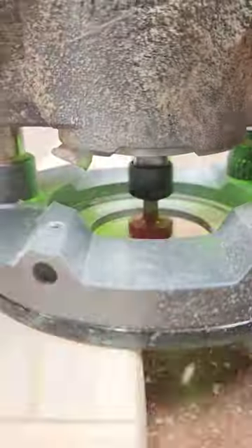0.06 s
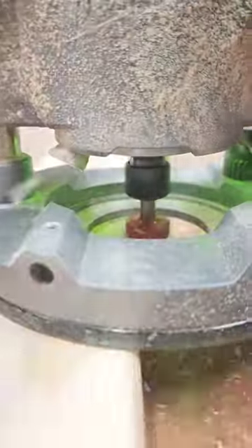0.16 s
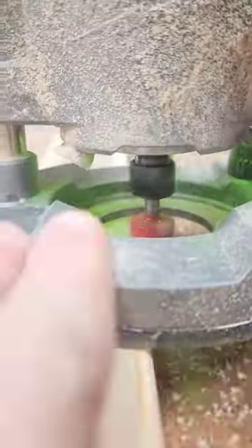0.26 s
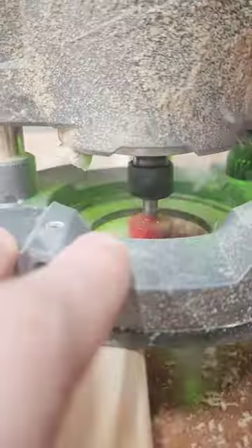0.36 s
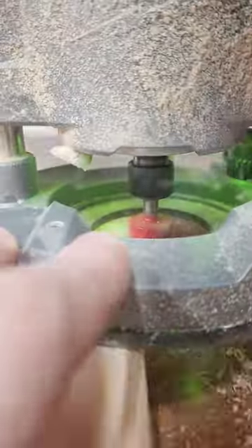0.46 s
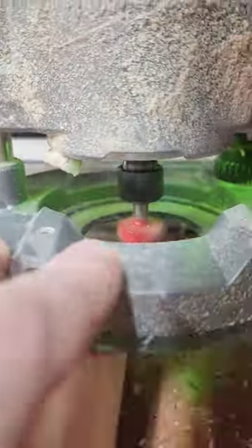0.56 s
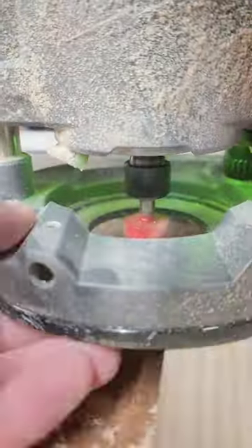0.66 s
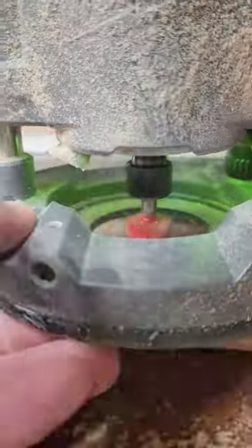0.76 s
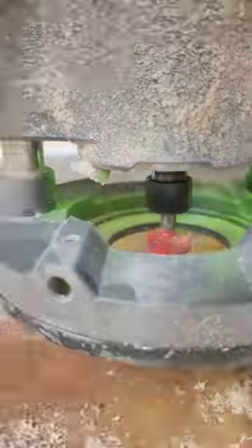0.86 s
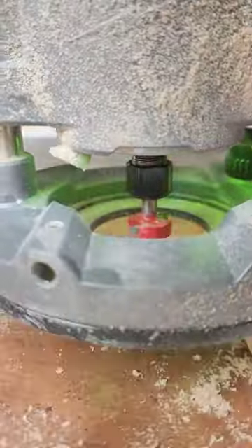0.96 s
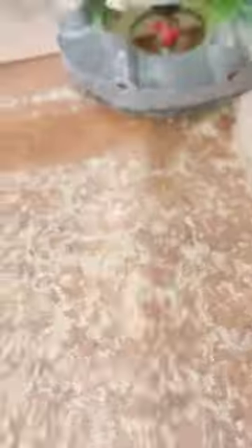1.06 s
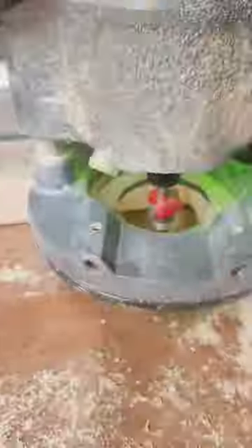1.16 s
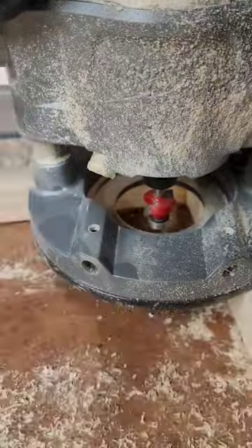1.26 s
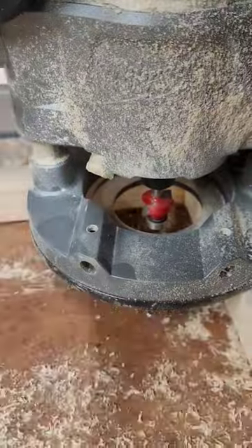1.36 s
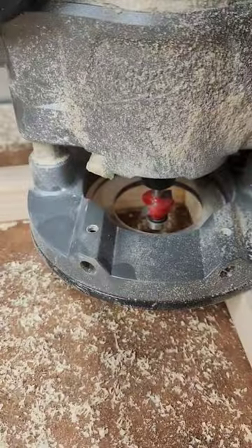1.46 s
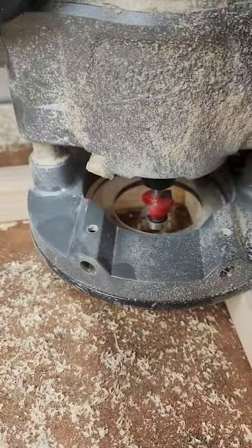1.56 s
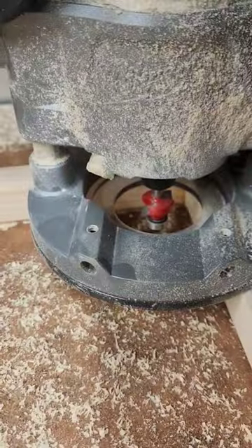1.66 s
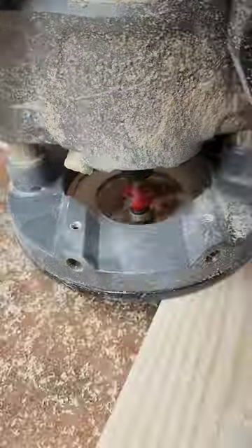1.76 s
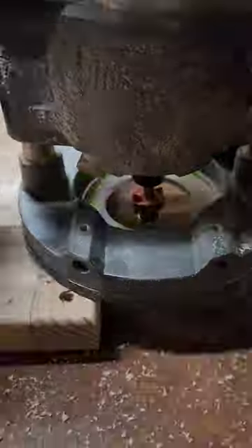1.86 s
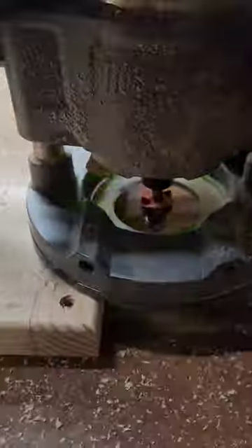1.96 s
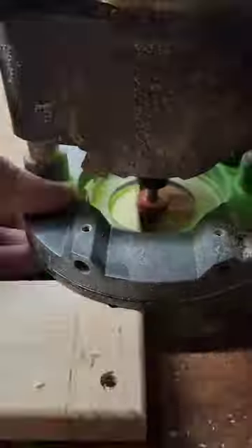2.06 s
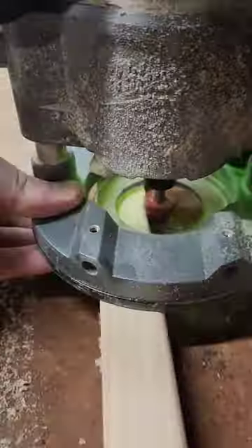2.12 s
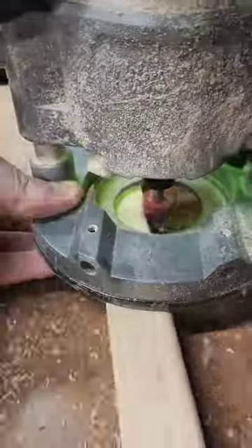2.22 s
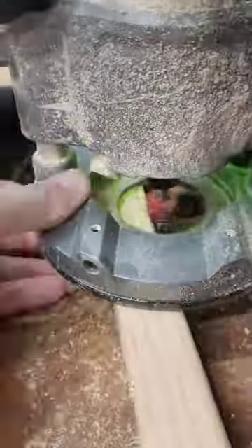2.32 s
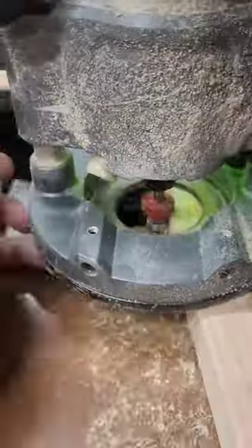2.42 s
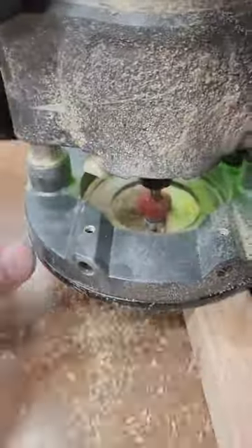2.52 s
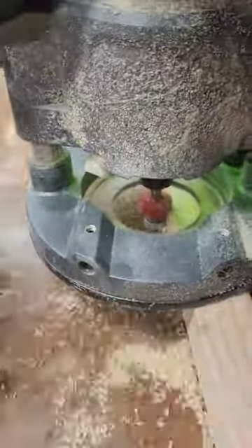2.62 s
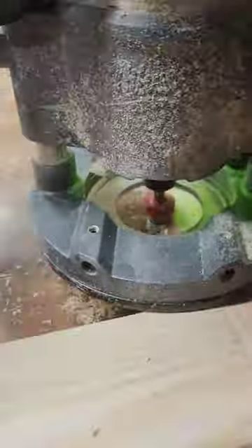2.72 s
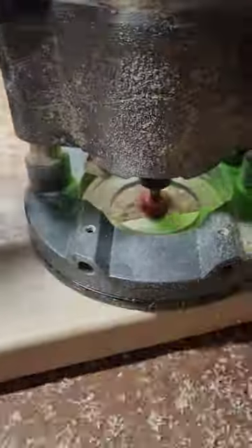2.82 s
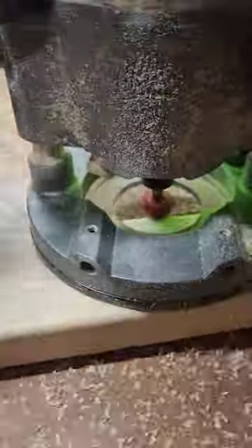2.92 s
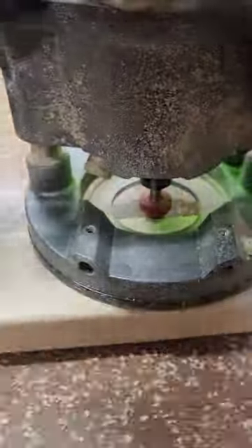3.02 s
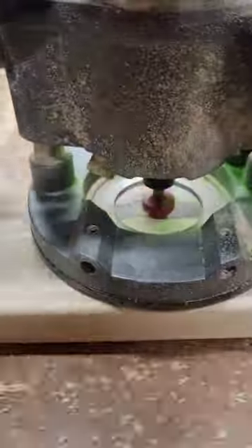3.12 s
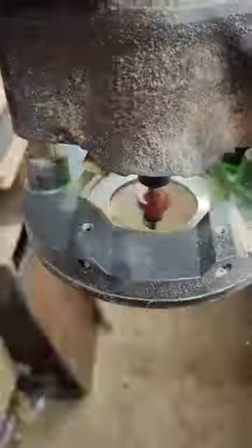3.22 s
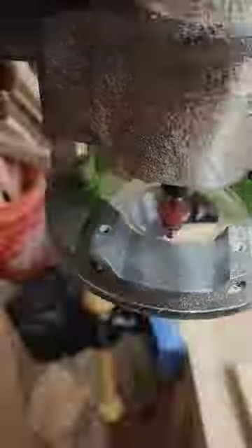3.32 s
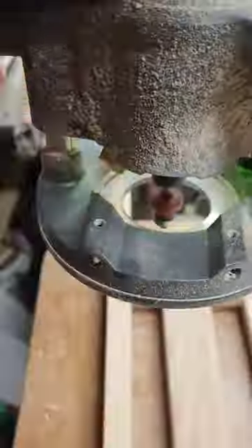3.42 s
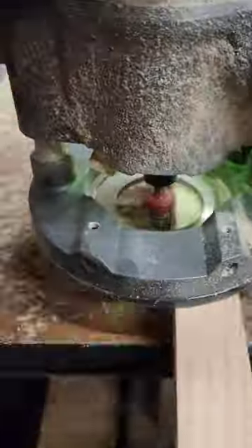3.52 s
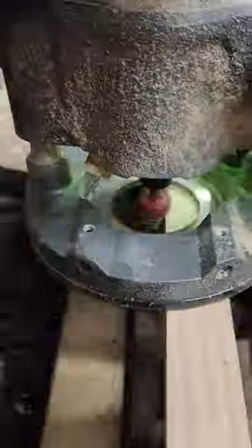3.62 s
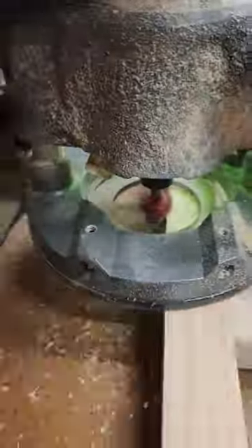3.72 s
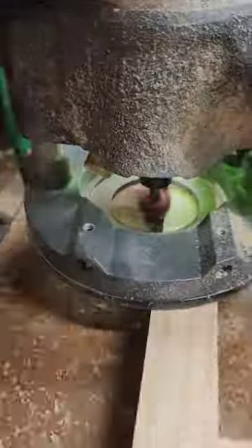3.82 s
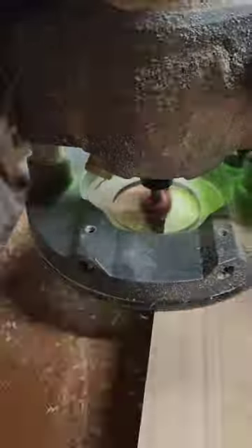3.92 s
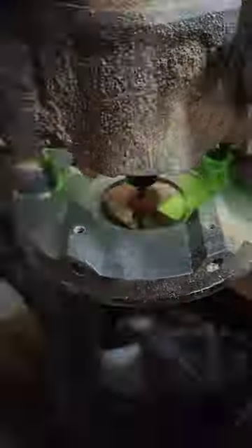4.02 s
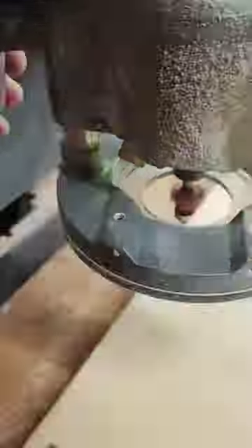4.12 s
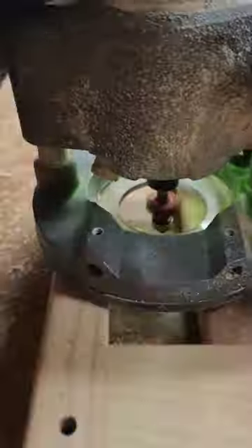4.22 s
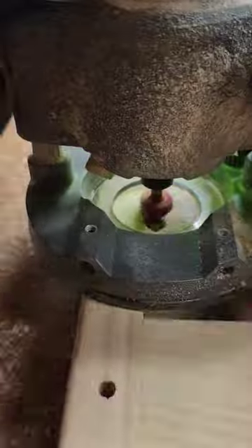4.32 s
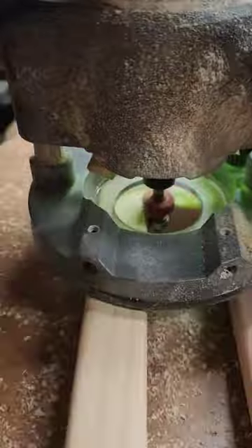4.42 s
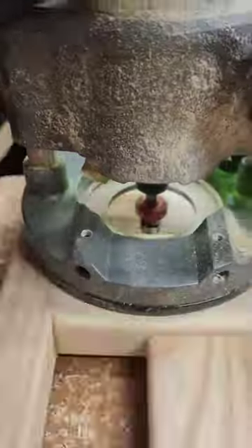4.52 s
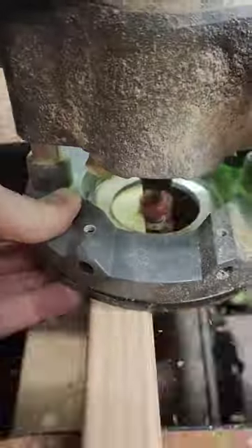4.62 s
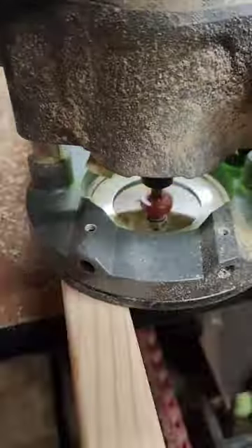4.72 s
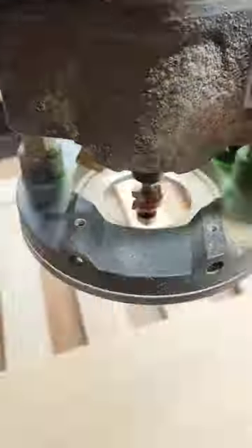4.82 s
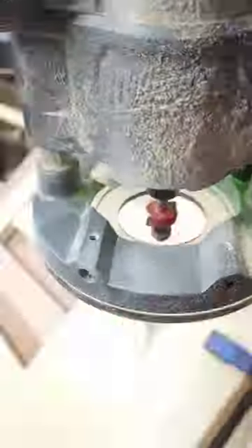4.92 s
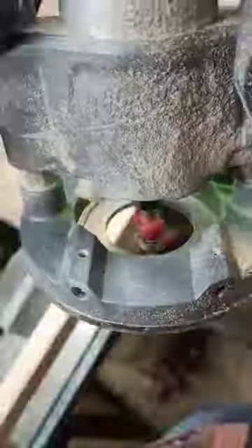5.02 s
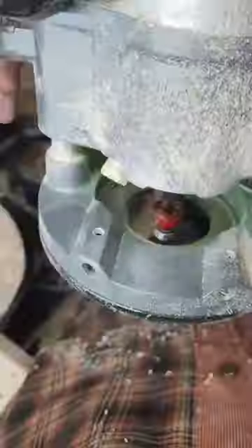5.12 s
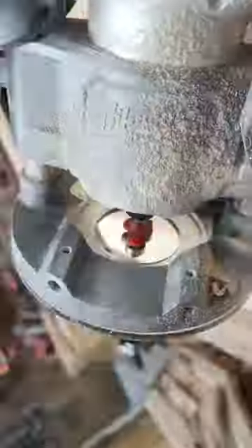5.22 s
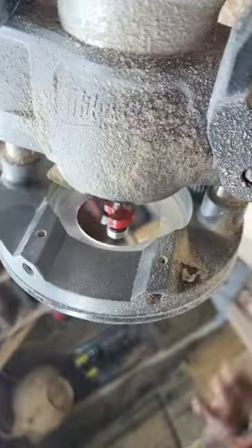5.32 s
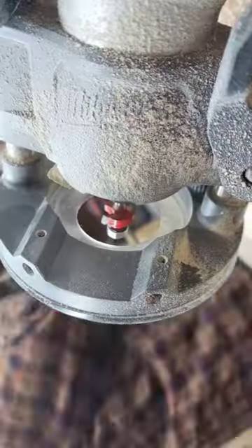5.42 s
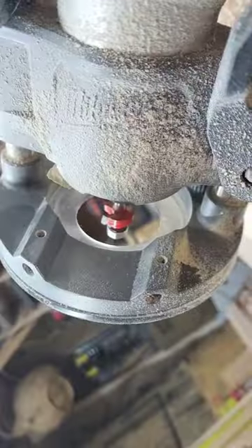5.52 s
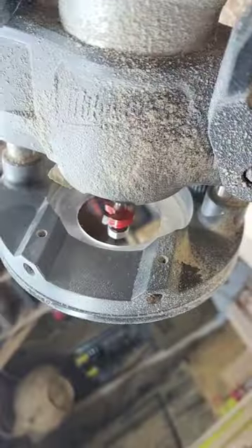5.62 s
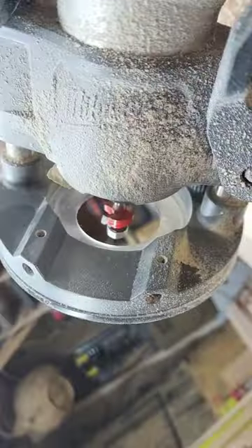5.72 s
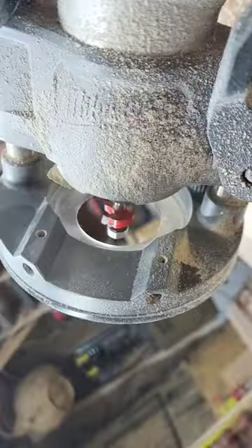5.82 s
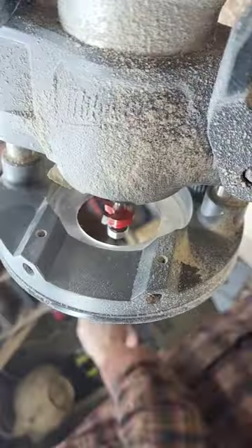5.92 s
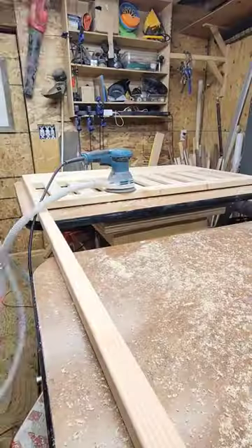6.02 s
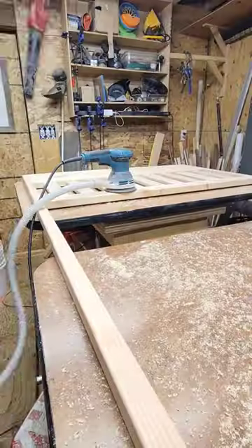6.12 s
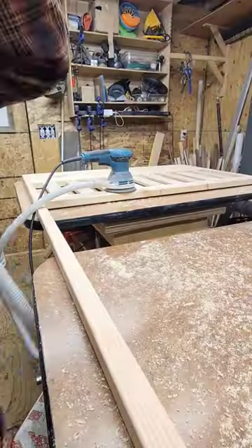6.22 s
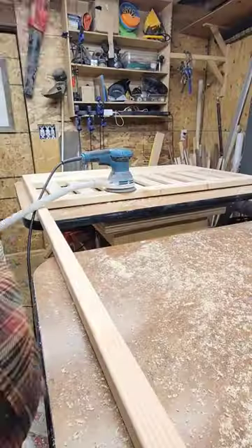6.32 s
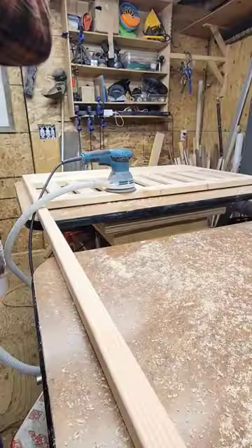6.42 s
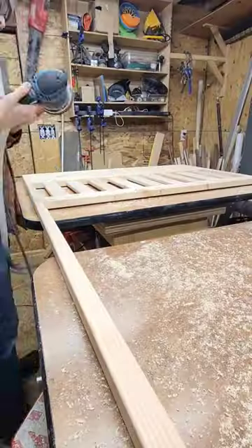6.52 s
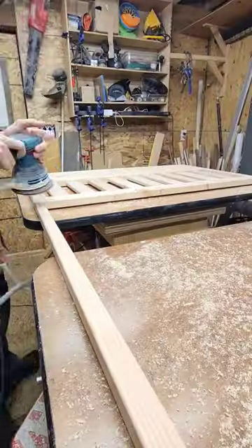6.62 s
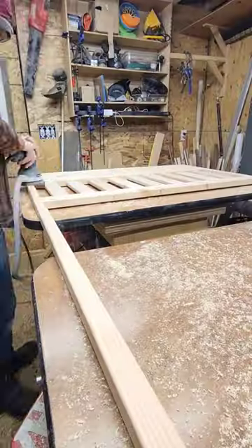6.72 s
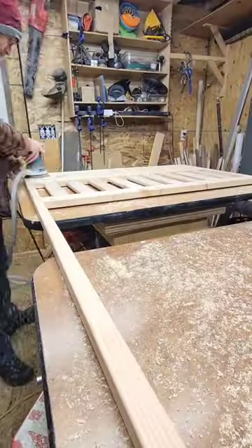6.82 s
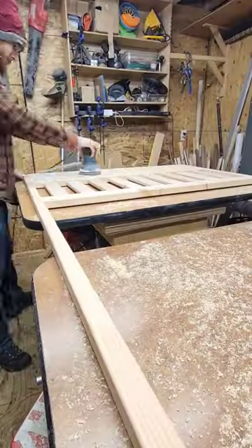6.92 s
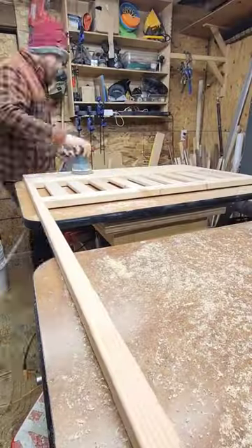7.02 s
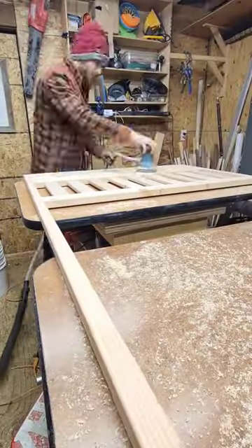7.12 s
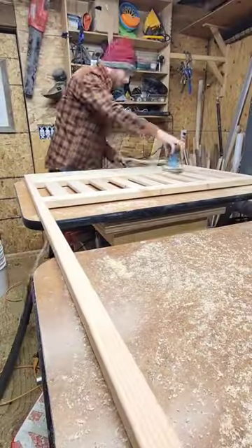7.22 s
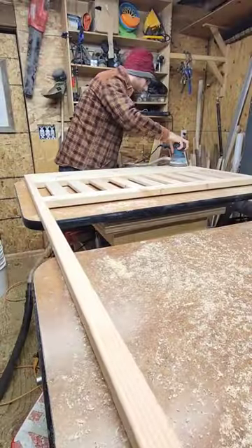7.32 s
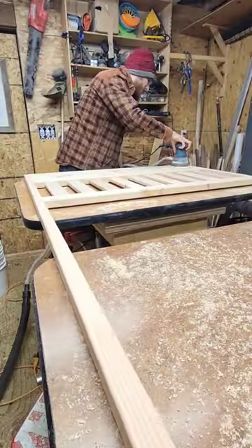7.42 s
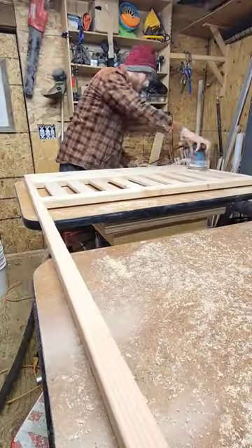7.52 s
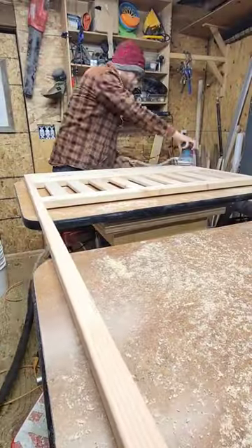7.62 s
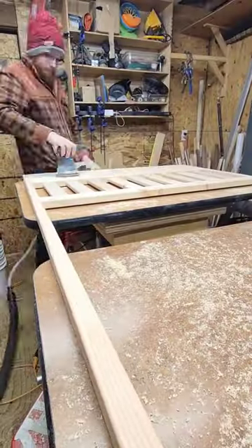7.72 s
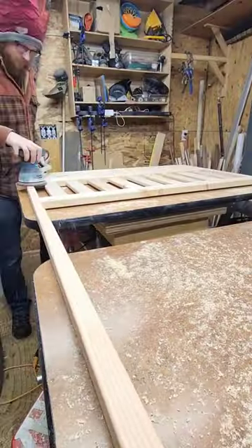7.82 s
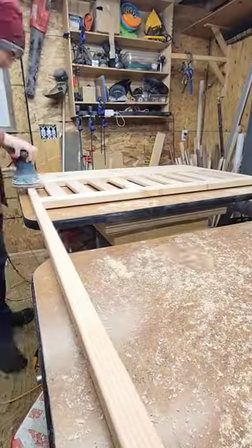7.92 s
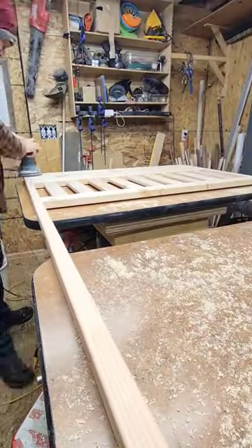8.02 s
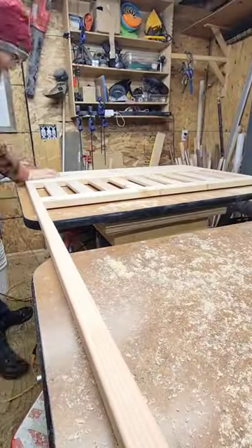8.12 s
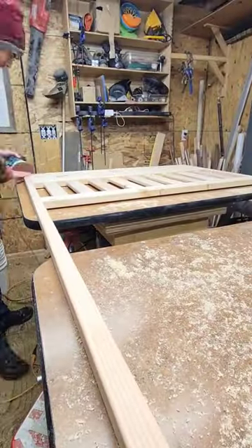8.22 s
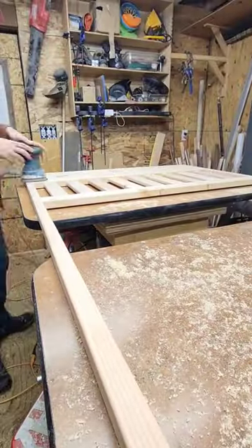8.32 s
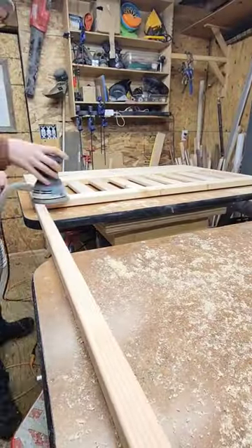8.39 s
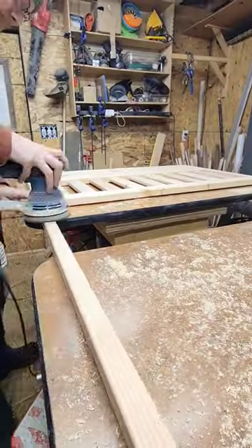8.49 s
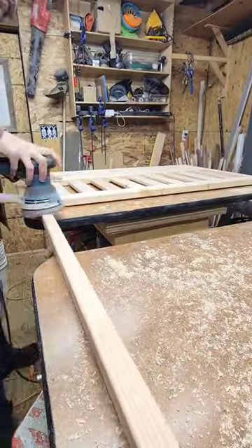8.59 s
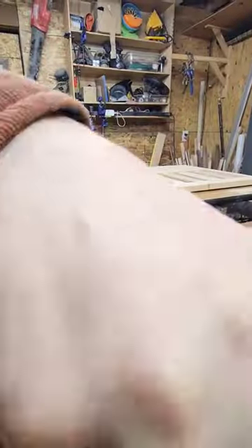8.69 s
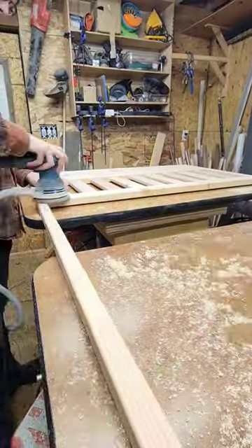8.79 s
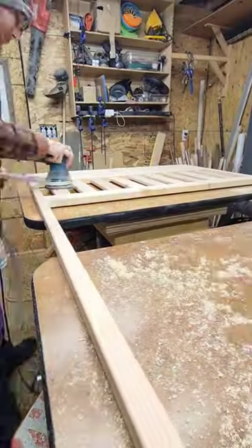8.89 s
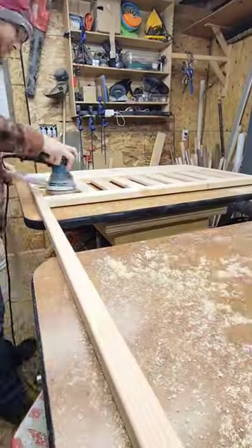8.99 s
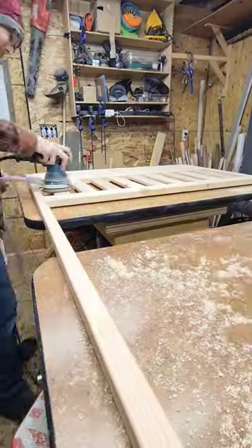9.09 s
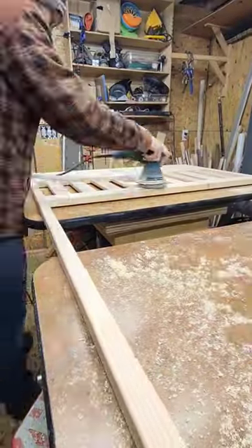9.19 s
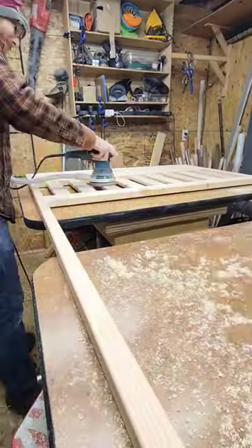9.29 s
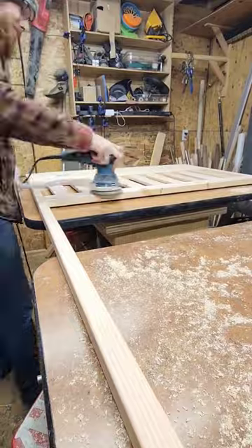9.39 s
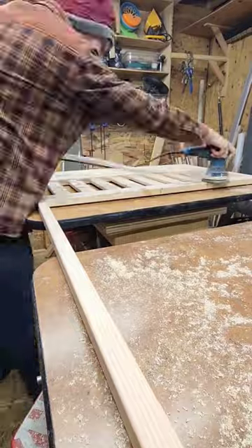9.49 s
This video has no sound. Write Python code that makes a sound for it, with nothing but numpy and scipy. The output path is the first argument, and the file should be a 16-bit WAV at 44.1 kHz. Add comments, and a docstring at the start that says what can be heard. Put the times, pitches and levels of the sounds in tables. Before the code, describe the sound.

A small woodworking shop, caught close up by a phone and sped up, so sounds are chopped about 43 times a second and burble with a fine ticking rattle. From 0 to 1 s a router whines near 5 kHz over bright rushing air, dipping in pitch as it bites wood, then brakes abruptly. Until 2.1 s there is quiet hiss, thin high electronic singing and a few light knocks. The router runs again from 2.1 to 4.9 s, swelling and sagging through repeated bites, with knocks just after 4 s. From 5 to 6.4 s it clatters down: hollow taps, gritty slides, sharpest cracks around 5.5 s. At 6.4 s a sander spins up in a tenth of a second to dense bright hiss; at 6.7 s suction rushes in and the hose whistles waveringly near 2 kHz. Around 8.75 s the hiss briefly eases while the whistle stands out, then it continues to the end, about 9.5 s.

```python
"""A cordless trim router whines along wood in a small shop, close to a phone: harmonics over air and cutting noise.
It pauses with its electronics singing, runs again and is put down with a clatter of ringing knocks and gritty slides.
Then an orbital sander spins up, its noise shaped by housing resonances, and its dust hose begins to whistle.
It is a time-lapse: snippets butt against each other, 43 a second, and every cut breaks the phase of
the tones, so they burble; the level dips around each cut and loud tones leave ticks."""
import sys
import numpy as np
from scipy import signal
from scipy.fft import rfft, irfft
from scipy.io import wavfile

SR = 44100
rng = np.random.default_rng(int(sys.argv[2]) if len(sys.argv) > 2 else 0)


def digitize_waveform(pressure):
    """Quantize a signal to 16-bit integers and store it at the path in sys.argv[1].

    Rows of a 2-D input are taken as channels; values are limited to [-1, 1].
    """
    field = np.atleast_2d(pressure).T
    bounded = np.clip(field, -1, 1)
    quanta = np.round(bounded * 32767).astype(np.int16)
    wavfile.write(sys.argv[1], SR, quanta)


N = 421155
TIME = np.arange(N) / SR
FREQS = np.maximum(np.arange(N // 2 + 1) * SR / N, 1)
EARS = np.array([[1], [-1]])  # left, right

# Levels below are settings: scatter and trims may be added where the sounds are made.
# Snippet length, and the first cut of each tool's stretch
SNIPPET_S = 1024 / 44100
ROUTER_CUT_S, SANDER_CUT_S = .0153, .0152
# Ticks at the cuts, relative to the tone that is cut
ROUTER_TICK_DB, HOSE_TICK_DB = 11.5, 20.5

# Still air of the shop, colour: pitch_hz, level_db
SHOP_COLOUR = [(24, -56.5), (40, -19), (350, -13.5), (670, -9), (1640, -14), (3300, -10), (8960, -14),
               (14400, -12.5), (15500, -13)]
SHOP_DB = -64

# The router's two runs: start_s, stop_s; the brake acts at the end of the first
ROUTER_RUNS = [(.0155, 1.037), (2.105, 4.938)]
BRAKE_S, BRAKE_RATE_PER_S = 1.019, 34
# Colour of the router's cooling air: pitch_hz, level_db
ROUTER_AIR_COLOUR = [(1500, -22.5), (3000, -10), (4500, -3), (6000, -0.5), (8000, -0.5), (11000, 1),
                     (13000, 0), (15500, 2)]
# Colour of the bit's cutting noise: pitch_hz, level_db
CUTTING_COLOUR = [(30, -28), (150, -27), (350, -12), (700, -2.5), (1200, -1.5), (1900, 1), (3200, 3.5),
                  (5000, -1.5), (9000, -29)]
# One row for each run: cooling_air_db, cutting_noise_db
RUN_LEVELS_DB = [(-25, -35), (-27, -38.5)]
# The whine of the free-running router sinks slowly as the battery tires
FREE_HZ, DROOP_HZ_PER_S = 4983, 19
# The bit bites into the wood: start_s, stop_s, build_s (time to full sag), sag_hz
BIT_BITES = [(.09, .68, .17, 160), (.70, .78, 0.035, 75), (.81, .91, 0.019, 126.5), (2.16, 2.48, 0.18, 165),
             (2.54, 2.92, 0.23, 175.6), (2.88, 3.31, 0.3, 195), (3.65, 4.19, .08, 175.3),
             (4.39, 4.58, .05, 93.7), (4.66, 4.84, .06, 165)]
RELEASE_S, FULL_SAG_HZ = 0.055, 181  # the bit comes free; sag at full load
# What full load adds: cooling air, cutting noise, whine left minus right
LOAD_AIR_DB, LOAD_CUT_DB, LOAD_PAN_DB = -1.1, 0.74, -3
WHINE_PAN_DB = 7.5  # left minus right when running free
# Whine as the router turns before the phone: time_s, level_db
WHINE_CURVE = [(0.03, -22.0), (0.35, -19.5), (0.4, -23), (0.44, -17.5), (0.77, -24.5), (0.86, -24),
               (1.0, -24.0), (2.12, -26.5), (2.28, -18), (2.37, -30), (2.53, -17), (2.7, -32),
               (2.74, -17.5), (2.91, -28.5), (3.21, -19.5), (3.44, -30.5), (3.72, -18.5), (4.18, -24),
               (4.48, -19.5), (4.65, -25), (4.76, -17), (4.93, -31.5)]
# Overtones of the whine: time_s, second_harmonic_db, third_harmonic_db
OVERTONE_CURVE = [(0.03, -21, -33), (0.17, -21.5, -24.5), (0.21, -15.5, -28), (0.47, -15.5, -43),
                  (0.86, -24.5, -19), (1.0, -21.5, -33), (2.12, -24.5, -31), (2.51, -27, -33),
                  (2.58, -20.5, -23.5), (3.18, -27.5, -38), (4.18, -26.5, -23), (4.3, -24.5, -37),
                  (4.35, -17.5, -35), (4.48, -27, -34), (4.93, -19.5, -28.5)]

# Tools and boards knocked about: start_s, body_db, crack_db, ring_hz, t60_s
KNOCK_EVENTS = [(.064, -39.5, -52, 810, 0.044), (1.178, -44, -41.5, 1080, 0.042),
                (1.2304, -45.5, -42.5, 1400, 0.19), (1.2466, -44, -43, 840, 0.091),
                (1.482, -43, -44, 970, 0.043), (1.6056, -47.5, -64, 830, 0.051),
                (4.068, -38, -37, 1096, .04), (4.277, -34.5, -50, 1145, 0.054),
                (4.958, -62, -27, 1900, .016), (4.9951, -36, -43, 3400, 0.016),
                (5.0256, -45, -40, 1510, .023), (5.0364, -38.5, -42, 1130, 0.021),
                (5.2393, -46.5, -52, 1350, 0.062), (5.2878, -48, -50, 1140, .047),
                (5.368, -44, -56, 1450, 0.05), (5.389, -50, -42, 1280, 0.015),
                (5.4418, -34.5, -26, 1570, 0.022), (5.4587, -29.5, -26, 1400, .012),
                (5.4713, -47, -24, 1610, 0.02), (5.4831, -32.5, -20.5, 1400, .011),
                (5.4985, -38, -34, 1520, .016), (5.5136, -41, -24.5, 1480, 0.0093),
                (5.543, -44, -60, 1230, 0.037), (5.675, -55, -47, 1650, 0.018),
                (5.7475, -43, -56, 1620, 0.056), (5.758, -41, -53, 1530, .015),
                (5.798, -46, -49.5, 1280, 0.041), (5.8506, -40, -55, 1370, 0.045),
                (5.881, -43.5, -58, 1130, .026), (6.0393, -40.5, -50, 1430, 0.028),
                (6.068, -44, -62, 1157, 0.019), (6.1017, -53, -50, 1620, 0.047),
                (6.1402, -45, -41, 1610, 0.037), (6.1592, -37, -30, 1460, 0.1),
                (6.188, -40.5, -36, 1530, 0.017), (6.2772, -49, -64, 1410, .022),
                (6.3837, -39.5, -43, 1430, 0.038), (6.43, -53, -28, 2080, 0.11)]
# Hollow resonances of a knocked body: multiple_of_ring, width_share, level_db
BODY_MODES = [(.29, 0.42, -4), (0.521, 0.66, 3.5), (.85, 1, 9), (1.12, 1, -11.5), (1.75, 0.33, -12.5)]
# Colour of the crack: pitch_hz, level_db
CRACK_COLOUR = [(1200, -12), (2800, 2), (4200, 0), (6500, -3.5), (9000, -8.5), (15500, -11)]
# Handling between the two tools: start_s, stop_s
HANDLING_SPAN = (4.96, 6.42)
# A typical faint tap: body_db, crack_db, ring_hz, t60_s (below zero: its noise swells slowly)
FAINT_TAP = (-56.5, -66, 1347, -1.5)

# Low electronic tones of the resting router: pitch_hz, level_db
IDLE_HUM_LINES = [(1570, -61.5), (1210, -68), (2100, -67.5), (3260, -80)]
# Its high tones, relative to the curve below: pitch_hz, level_db
IDLE_WHISTLE_LINES = [(4694, -2), (5895, -2.5), (8306, -18), (11946, -21)]
# Level of those high tones: time_s, level_db
IDLE_WHISTLE_CURVE = [(1.04, -57), (1.28, -61), (1.31, -55), (1.42, -57), (1.52, -64), (1.92, -68),
                      (1.95, -49), (2.1, -51)]
# Colour of the hiss in the pause: pitch_hz, level_db
IDLE_AIR_COLOUR = [(40, -22), (150, -22), (400, -11), (750, -4), (1500, 1.5), (2600, -4.5), (5000, 0),
                   (9000, -4.5), (15500, -5.5)]
IDLE_AIR_DB = -51.5

# Things slid over the bench: start_s, stop_s, hiss_db, rumble_db
SLIDE_EVENTS = [(4.964, 4.991, -35, -43), (5.002, 5.08, -53, -51), (5.121, 5.149, -42.5, -52),
                (5.202, 5.251, -43.5, -49), (5.355, 5.395, -55, -40.5), (5.522, 5.578, -53, -54),
                (5.866, 5.9, -47, -61), (5.925, 5.977, -42.5, -74), (6.153, 6.19, -39, -41)]
# Colour of the sawdust's hiss: pitch_hz, level_db
SLIDE_HISS_COLOUR = [(1500, -24), (3000, -5), (5500, 1), (8000, -1), (11000, -3.5), (15500, -7.5)]
# Colour of the bench's rumble: pitch_hz, level_db
SLIDE_RUMBLE_COLOUR = [(40, -24), (250, -10), (600, -5), (1200, 0), (1700, -1), (2600, -9), (5000, -31)]

SANDER_ON_S, SUCTION_ON_S = 6.431, 6.703
# The sander spins up: time_s, share_of_full_speed
SPIN_UP_CURVE = [(6.435, .4), (6.459, .66), (6.482, .94), (6.505, .98), (6.53, 1)]
# The sander's motor whine; its pitch dips briefly, then slowly rises: time_s, pitch_hz, level_db
MOTOR_CURVE = [(6.6, 7750, -23), (6.8, 7690, -28), (7.35, 7710, -27.5), (8.1, 7774, -26.5),
               (8.9, 7810, -22), (9.55, 7790, -24.5)]
# Partials of the motor whine: multiple, level_db, left_lead_rad
MOTOR_PARTIALS = [(.5, 1.5, 0), (1, 0, -1.8), (1.5, -13, 0)]
# The cooling fan's wandering note: time_s, pitch_hz, level_db
FAN_CURVE = [(6.55, 4120, -29), (7.2, 4200, -39), (7.42, 4030, -20.5), (7.72, 3980, -35), (7.9, 4190, -29),
             (8.3, 4200, -42), (8.68, 4100, -30), (8.9, 4140, -26), (9.55, 4040, -37)]
# Fixed tone beside the motor: pitch_hz, level_db
SANDER_HUM_LINES = [(1208, -44.5)]
# Colour of the hiss of paper and fan: pitch_hz, level_db
PAPER_COLOUR = [(30, -25), (200, -19), (450, -24.5), (700, -4), (1000, -10), (1700, -6.5), (2700, 5),
                (3600, 1), (4400, 6), (5700, -1), (7000, -3), (9000, -2), (15500, -1.5)]
# Resonances of pad and housing: pitch_hz, width_hz, level_db
HOUSING_PEAKS = [(3584, 180, 10), (4672, 197, 13), (5046, 480, 15.5), (6260, 210, 13.5), (8250, 120, 12.5)]
HISS_DB, HISS_FADE_DB_PER_S = -17.5, 0.5  # the hiss at the start, and how it fades
# The pad is eased off the wood once: start_s, ease_s, return_s (time constant of bearing down)
PAD_EASE = (8.725, 0.078, .16)
# What the hiss, the motor and the rush of air then lose
EASE_HISS_DB, EASE_MOTOR_DB, EASE_RUSH_DB = -15.5, -14.5, -8

# Rush of air into the hose: time_s, level_db
RUSH_CURVE = [(6.7, -28.5), (7.7, -29.5), (8.3, -29), (8.8, -24.5), (9.55, -29)]
# Colour of that rush: pitch_hz, level_db
RUSH_COLOUR = [(30, -32), (200, -20), (450, -8.5), (750, -7), (1100, -1.5), (1700, 9.5), (2600, 10),
               (4000, 6), (7000, 7), (15000, 2.5)]
# Airflow whistling in the hose: time_s, pitch_hz, level_db
HOSE_CURVE = [(6.76, 2090, -18), (7.22, 2102, -18), (7.46, 2015, -25), (7.5, 2012, -21.5),
              (7.64, 2031, -24), (7.74, 1933, -20), (7.87, 2123, -17.5), (7.99, 2073, -23),
              (8.06, 2092, -15.5), (8.2, 2175, -21.5), (8.27, 2050, -16), (8.36, 2159, -23),
              (8.41, 2191, -14.5), (8.48, 2074, -17.5), (8.71, 2030, -17), (8.8, 2075, -14),
              (8.87, 2076, -21.5), (9.11, 2059, -16), (9.27, 2100, -16.5), (9.38, 1997, -18),
              (9.48, 2103, -17.5), (9.52, 2017, -17)]
# Partials of the whistle: multiple, level_db
HOSE_PARTIALS = [(1, 1.3), (2, -32), (3, -16.5), (4, -22.5), (6, -37.5)]
# The whistle as the sander is moved: time_s, left_minus_right_db, unevenness_db
HOSE_PLACE_CURVE = [(7.25, 0, 3), (7.42, 9, 4.5), (7.65, 6.5, 8.5), (7.85, 1, 2), (8.3, -0.5, 2.5),
                    (8.73, 0.5, 1.1), (8.79, -11, 1.5), (8.88, 0, 2)]

TOP_HZ = 15600  # upper limit of the phone


def undb(db):
    """Decibels to gain."""
    return 10 ** (np.asarray(db) / 20)


def unit(x):
    """Scale to rms 1."""
    return x / np.sqrt(np.mean(x ** 2))


def gate(start, stop, edge=0.00071):
    """One between two times, with short ramps of edge seconds."""
    return np.clip((TIME - start) / edge, 0, 1) * np.clip((stop - TIME) / edge, 0, 1)


def snippet(first_cut):
    """Number of the snippet that each sample lies in."""
    return np.floor((TIME - first_cut) / SNIPPET_S).astype(int) + 1


def stepped_time(first_cut):
    """Time that stands still at the middle of each snippet."""
    return first_cut + (snippet(first_cut) - .5) * SNIPPET_S


def held(rows, first_cut):
    """Columns of a curve; slow changes turn into steps from one snippet to the next."""
    time_s, *columns = np.transpose(rows)
    return [np.interp(stepped_time(first_cut), time_s, column) for column in columns]


def scatter(first_cut):
    """A fresh normal value for every snippet."""
    k = snippet(first_cut)
    return rng.standard_normal(k[-1] + 1)[k]


def walk(rate):
    """Smooth chance with spread near 1, through rate knots a second."""
    knots = rng.standard_normal(int(N / SR * rate) + 2)
    return 1.2 * np.interp(TIME * rate, np.arange(len(knots)), knots)


def colour(points):
    """Gain at every frequency from pitch_hz, level_db points."""
    hz, db = np.transpose(points)
    return undb(np.interp(np.log(FREQS), np.log(hz), db))


def noise(gain, alike=.8, alike_hz=6000):
    """Stereo noise of a given colour; the two microphones agree less in the treble."""
    c = np.clip(alike, 0, 1) / (1 + (FREQS / alike_hz) ** 4)
    mid = irfft(rfft(rng.standard_normal(N)) * gain * np.sqrt(1 + c), N)
    side = irfft(rfft(rng.standard_normal(N)) * gain * np.sqrt(1 - c), N)
    return (mid + EARS * side) / np.std(mid)


def tone(hz, first_cut, scatter_db, lead=0., spread=0.57, ceiling=1.3):
    """A partial whose phase breaks at each cut; standing waves give each microphone its own phase and level."""
    phase = 2 * np.pi * (np.cumsum(hz) / SR + 10 * scatter(first_cut))
    apart = lead + spread * (walk(6) + .5 * scatter(first_cut))
    shared = scatter(first_cut)
    separate = np.array([scatter(first_cut), scatter(first_cut)])
    luck = (shared + separate) / np.sqrt(2)
    db = scatter_db * np.minimum(luck, ceiling)  # deep fades but low peaks
    return np.sqrt(2) * undb(db) * np.sin(phase + EARS * apart / 2)


def steady(lines, first_cut):
    """A set of tones at fixed pitches."""
    return sum(undb(db) * tone(np.full(N, hz), first_cut, scatter_db=3.0) for hz, db in lines)


def splice_dips(first_cut, depth=.85, half_width_s=0.00043):
    """The level falls away softly for a moment around every cut."""
    from_cut = (TIME - first_cut + SNIPPET_S / 2) % SNIPPET_S - SNIPPET_S / 2
    return 1 - depth * np.exp(-(from_cut / half_width_s) ** 2)


def cut_ticks(cut, tick_db, scatter_db=3, bass_db=-14, shelf_hz=1100, top_hz=2900):
    """Each cut through a loud tone leaves a dull tick of chance size and sign: a quick, even rattle."""
    at_cut = np.diff(snippet(cut), prepend=0)
    size = undb(tick_db + scatter_db * scatter(cut)) * (1 + 0.43 * EARS * scatter(cut))
    ticks = 2 * at_cut * np.sign(scatter(cut)) * size
    bass = signal.sosfilt(signal.butter(1, shelf_hz, fs=SR, output="sos"), ticks)
    thinned = ticks - (1 - undb(bass_db)) * bass
    return signal.sosfilt(signal.butter(4, top_hz, fs=SR, output="sos"), thinned)


def shop_air():
    """A faint coloured noise fills the shop, its level stepping by chance at each cut."""
    return undb(SHOP_DB + 3.0 * scatter(ROUTER_CUT_S)) * noise(colour(SHOP_COLOUR))


def sag(t):
    """How far the load pulls the whine down, in Hz: each bite builds up, holds and lets go."""
    return sum(hz * np.clip((t - start) / build_s, 0, 1) * np.clip((stop - t) / RELEASE_S, 0, 1)
               for start, stop, build_s, hz in BIT_BITES)


def router(brake_fade=5.7, hunt=0.00414, free_hunt=0.00059, wobble=0.001086):
    """Fan blades whine in three harmonics over cooling air and cutting noise; load pulls the pitch down."""
    cut = ROUTER_CUT_S
    t = stepped_time(cut)
    load = sag(t) / FULL_SAG_HZ
    second_run = TIME >= ROUTER_RUNS[1][0]
    air_db, cutting_db = np.array(RUN_LEVELS_DB)[second_run.astype(int)].T
    first_db, = held(WHINE_CURVE, cut)
    second_db, third_db = held(OVERTONE_CURVE, cut)
    braking = np.exp(-BRAKE_RATE_PER_S * np.maximum(TIME - BRAKE_S, 0) * ~second_run)

    # the speed control hunts a little as the bit bites
    unsteady = 1 + (free_hunt + hunt * load) * scatter(cut) + wobble * walk(150)
    hz = (FREE_HZ - DROOP_HZ_PER_S * t - sag(t)) * braking * unsteady
    pan_db = WHINE_PAN_DB + LOAD_PAN_DB * load
    whine = undb(first_db - 1.1 + EARS * pan_db / 2) * tone(hz, cut, scatter_db=3.5, lead=1.33, spread=0.17)
    upper = undb(second_db - 2.7) * tone(2 * hz, cut, scatter_db=4.0, lead=1.7, spread=0.93)
    upper += undb(third_db + 1.5) * tone(3 * hz, cut, scatter_db=4.5, lead=2.0, spread=0.99)
    flutter = 1 + 0.19 * walk(900)
    tones = flutter * (whine + undb(EARS * 2.5) * braking ** brake_fade * upper)

    air_gain = undb(air_db + LOAD_AIR_DB * load + 1.3 * scatter(cut))
    air = air_gain * noise(colour(ROUTER_AIR_COLOUR), alike=0.61, alike_hz=7000)
    chips_gain = undb(cutting_db + LOAD_CUT_DB * load + 1.03 * scatter(cut))
    chips = chips_gain * noise(colour(CUTTING_COLOUR), alike=0.7, alike_hz=5000)

    sound = (tones + undb(EARS * 1.4) * (air + chips)) * splice_dips(cut)
    sound = sound + cut_ticks(cut, first_db + ROUTER_TICK_DB, top_hz=600)
    return sound * sum(gate(start, stop) for start, stop in ROUTER_RUNS)


def faint_taps(count=18, spread_db=3, ring_spread=0.23):
    """Light contacts of fingers and wood: brief noise bursts loosely spread in time, as rows like the knocks."""
    body_db, crack_db, ring_hz, t60 = FAINT_TAP
    start, stop = HANDLING_SPAN
    times = start + (np.arange(count) + rng.random(count)) / count * (stop - start)
    return [(s, body_db + spread_db * a, crack_db + spread_db * b, ring_hz * np.exp(ring_spread * c), t60)
            for s, (a, b, c) in zip(times, rng.standard_normal((count, 3)))]


def knocks(tail_db=-25, tail_t60=0.047, tick=4):
    """A tick and noise excite a crack and hollow body resonances, with a trace of the room; faint taps join."""
    size, lead_in = 4096, 32  # samples
    out = np.zeros((2, N))
    t, f = np.arange(size) / SR, np.arange(size // 2 + 1) * SR / size + 1
    crack_gain = np.interp(f, FREQS, colour(CRACK_COLOUR))
    for s, body_db, crack_db, ring_hz, t60 in KNOCK_EVENTS + faint_taps():
        fade = undb(-60 * t / t60) + undb(tail_db - 60 * t / tail_t60)
        push = fade * (rng.standard_normal(size) + 0.48 * rng.standard_normal((2, size)))
        push[:, 0] += tick * undb(min(crack_db - body_db, 0))  # a weak crack has a weaker tick
        spectrum = rfft(np.roll(push, lead_in, axis=1))
        body_gain = sum(undb(db) / (1 + 1j * (f / (k * ring_hz) - k * ring_hz / f) / width) ** 2
                        for k, width, db in BODY_MODES)
        body = undb(body_db - 7.5) * unit(irfft(spectrum * body_gain))
        crack = undb(crack_db - 11.5) * unit(irfft(spectrum * crack_gain))
        i = int(s * SR) - lead_in
        out[:, i:i + size] += body + crack
    return out


def resting_router():
    """Between the runs thin electronic tones stand over the hiss of the shop."""
    cut = ROUTER_CUT_S
    whistle_db, = held(IDLE_WHISTLE_CURVE, cut)
    tones = steady(IDLE_HUM_LINES, cut) + undb(whistle_db) * steady(IDLE_WHISTLE_LINES, cut)
    air_gain = undb(IDLE_AIR_DB + 0.5 * scatter(cut))
    air = air_gain * noise(colour(IDLE_AIR_COLOUR), alike=0.55, alike_hz=4960)
    return (tones + air) * gate(ROUTER_RUNS[0][1], ROUTER_RUNS[1][0])


def slides(grain_db=3):
    """Gritty scrapes: hiss from the sawdust, rumble from the bench, both roughened by fast level changes."""
    hiss_gain = sum(undb(db) * gate(a, b, edge=0.0047) for a, b, db, _ in SLIDE_EVENTS)
    rumble_gain = sum(undb(db) * gate(a, b, edge=0.0043) for a, b, _, db in SLIDE_EVENTS)
    grit = undb(grain_db * walk(440) - 5.5)
    hiss = hiss_gain * noise(colour(SLIDE_HISS_COLOUR))
    rumble = rumble_gain * noise(colour(SLIDE_RUMBLE_COLOUR))
    return grit * (hiss + rumble)


def eased(t):
    """How far the pad is off the wood, 0-1: a quick lift and a slow return."""
    start, ease_s, return_s = PAD_EASE
    return np.clip((t - start) / ease_s, 0, 1) * np.exp(-np.maximum(t - start - ease_s, 0) / return_s)


def paper_level(t):
    """Level of the paper's hiss in dB: it fades slowly and drops while the pad is eased off."""
    return HISS_DB - HISS_FADE_DB_PER_S * (t - SANDER_ON_S) + EASE_HISS_DB * eased(t)


def sander():
    """The motor spins up to a thin whine; paper and fan hiss through the resonances of the housing."""
    cut = SANDER_CUT_S
    t = stepped_time(cut)
    hz, whine_db = held(MOTOR_CURVE, cut)
    fan_hz, fan_db = held(FAN_CURVE, cut)
    speed, = held(SPIN_UP_CURVE, cut)

    hz = hz * speed * (1 + 0.001194 * scatter(cut))
    motor = sum(undb(whine_db + db - 2.0) * tone(k * hz, cut, scatter_db=0.0, lead=lead, spread=0.94)
                for k, db, lead in MOTOR_PARTIALS)
    motor += undb(fan_db) * tone(fan_hz * speed * (1 + 0.00494 * walk(120)), cut, scatter_db=4.5)
    motor *= undb(EASE_MOTOR_DB * eased(t))

    peaks = 1 + sum((undb(db) - 1) / (1 + (2 * (FREQS - f) / width) ** 2) ** 1.7
                    for f, width, db in HOUSING_PEAKS)
    hiss = noise(colour(PAPER_COLOUR) * peaks, alike=0.73, alike_hz=6700)
    # while the pad is still slow, the hiss is read more slowly and lies lower
    place = np.arange(N) + np.cumsum((1 - speed)[::-1])[::-1]
    hiss = np.array([np.interp(place, np.arange(N), ear) for ear in hiss])
    hiss = undb(paper_level(t) + 1.03 * scatter(cut)) * hiss

    # a rough rising note sounds until full speed is nearly reached
    rising = (speed + np.interp(TIME, *np.transpose(SPIN_UP_CURVE))) / 2
    run_up = undb(-19.5) * tone(4900 * rising * (1 + 0.0274 * walk(500)), cut, scatter_db=2.5) * (speed < .97)
    sound = speed ** 3 * (motor + hiss + run_up) + steady(SANDER_HUM_LINES, cut)
    return sound * gate(SANDER_ON_S, N)


def dust_hose(rise_s=.018, spread_per_db=0.28):
    """Suction makes the ribbed hose whistle; pitch wanders as the sander is moved and the airflow changes."""
    cut = SANDER_CUT_S
    hz, whistle_db = held(HOSE_CURVE, cut)
    pan_db, uneven_db = held(HOSE_PLACE_CURVE, cut)
    flow = 1 - .25 * np.exp(-np.maximum(TIME - SUCTION_ON_S, 0) / rise_s)  # the whistle glides up at first
    hz = hz * flow * (1 + 0.006 * scatter(cut) + 0.002494 * walk(200))
    whistle = sum(undb(whistle_db + db) * tone(k * hz, cut, scatter_db=uneven_db, lead=0.11,
                                               spread=spread_per_db * uneven_db * k)
                  for k, db in HOSE_PARTIALS)
    sides = undb(EARS * pan_db / 2)
    return whistle * sides / np.sqrt(np.mean(sides ** 2, axis=0))  # panning keeps the power


def extractor():
    """The dust extractor draws a rush of air, as coloured noise, through the whistling hose."""
    cut = SANDER_CUT_S
    rush_db, = held(RUSH_CURVE, cut)
    rush_db = rush_db + EASE_RUSH_DB * eased(stepped_time(cut))
    rush = undb(rush_db + 1.7 * scatter(cut)) * noise(colour(RUSH_COLOUR), alike=1.0, alike_hz=7000)
    return (dust_hose() + rush) * gate(SUCTION_ON_S, N, edge=0.0029)


def hose_ticks():
    """Cuts through the hose whistle leave ticks that follow its level."""
    _, whistle_db = held(HOSE_CURVE, SANDER_CUT_S)
    return cut_ticks(SANDER_CUT_S, whistle_db + HOSE_TICK_DB) * gate(SUCTION_ON_S, N)


def scene():
    """Router, clatter, then sander and hose, whose level dips at every cut, with ticks once the hose whistles."""
    dips = splice_dips(SANDER_CUT_S, depth=1.0, half_width_s=0.00054)
    sanding = dips * (sander() + extractor()) + hose_ticks()
    routing = router() + resting_router()
    handling = knocks() + slides()
    return shop_air() + routing + handling + sanding * undb(EARS * 0.18)


def record(dry):
    """The phone cuts the top with a steep low-pass."""
    return signal.sosfilt(signal.ellip(10, .2, 70, TOP_HZ, fs=SR, output="sos"), dry)


dry = scene()
out = record(dry)
digitize_waveform(out)
```